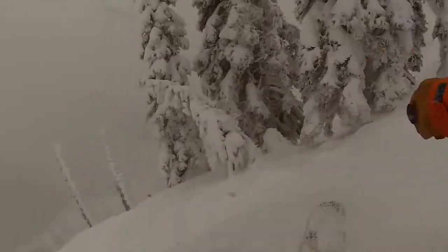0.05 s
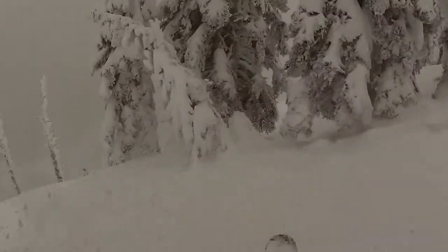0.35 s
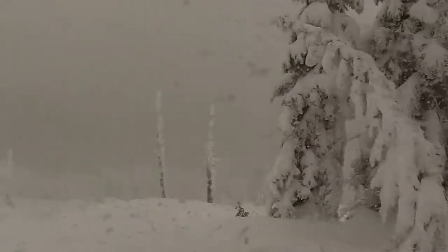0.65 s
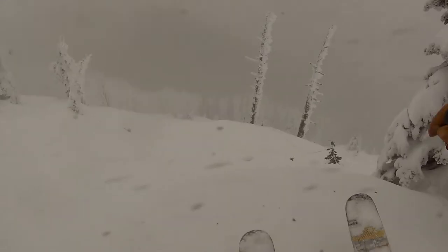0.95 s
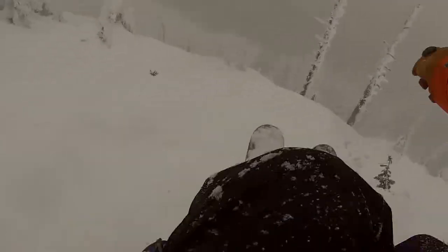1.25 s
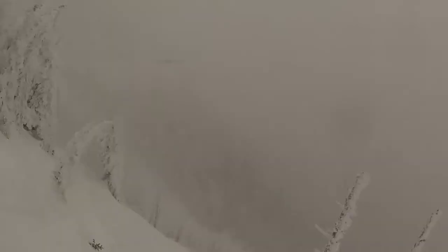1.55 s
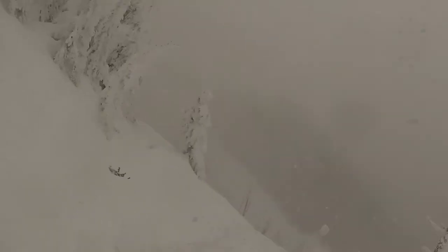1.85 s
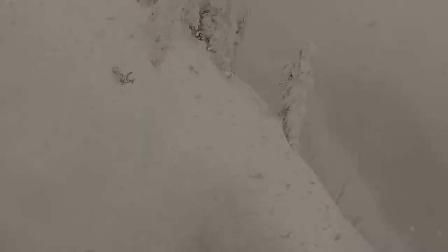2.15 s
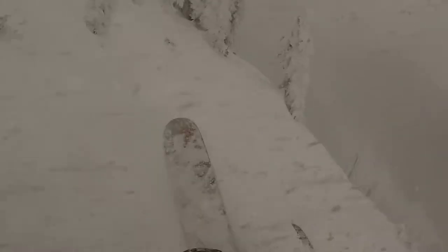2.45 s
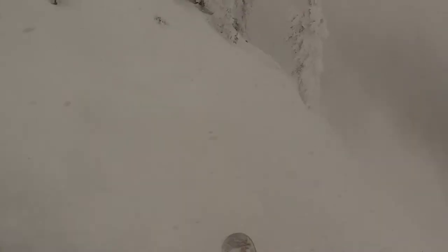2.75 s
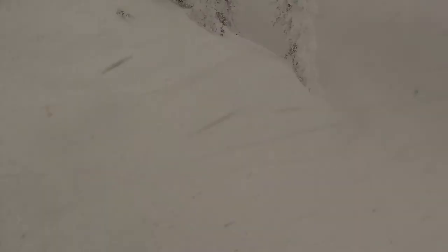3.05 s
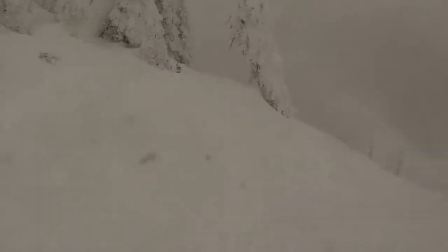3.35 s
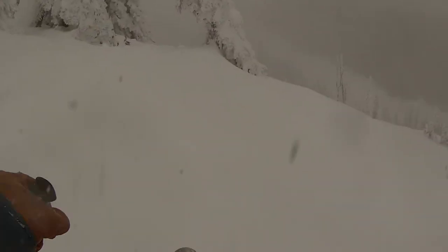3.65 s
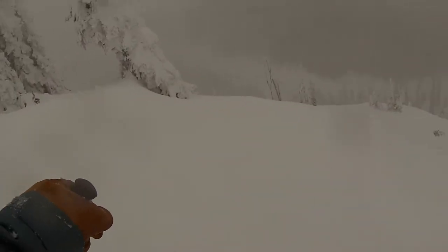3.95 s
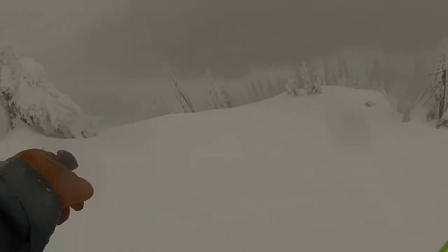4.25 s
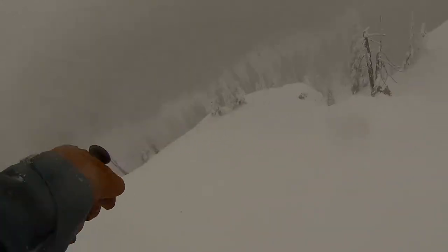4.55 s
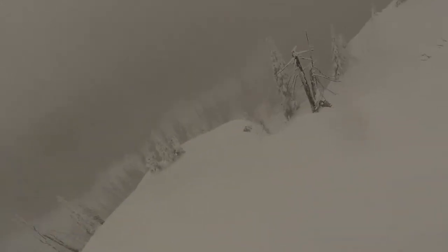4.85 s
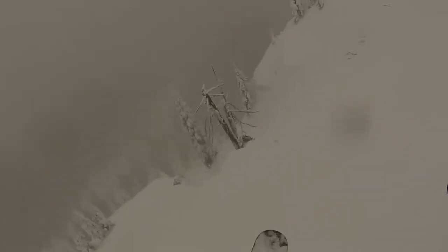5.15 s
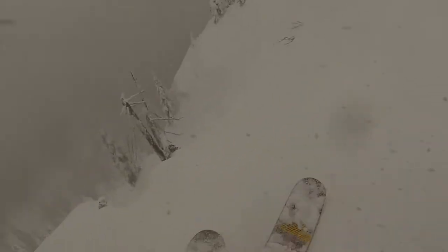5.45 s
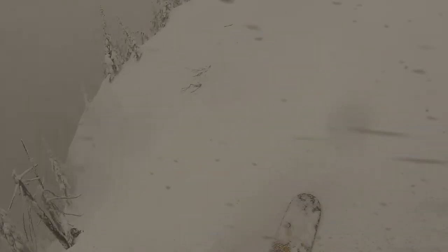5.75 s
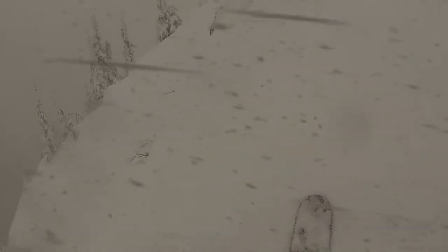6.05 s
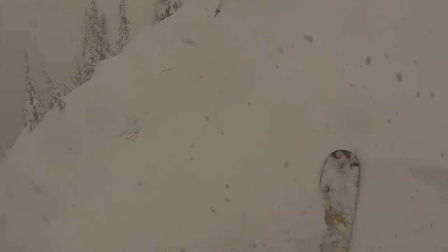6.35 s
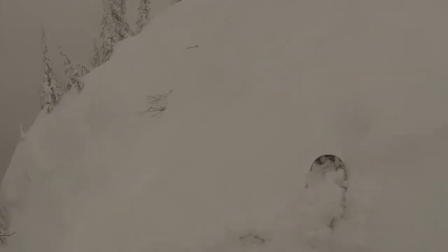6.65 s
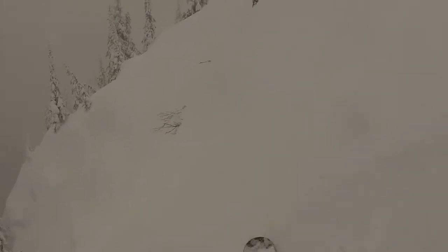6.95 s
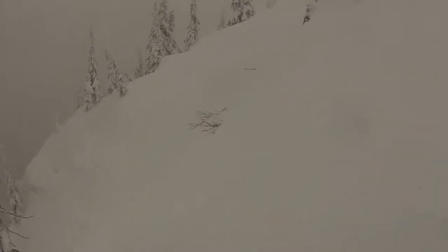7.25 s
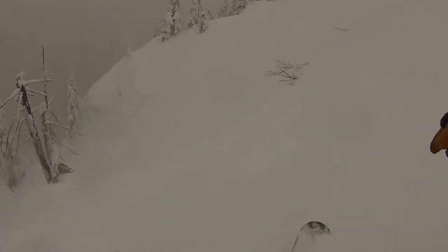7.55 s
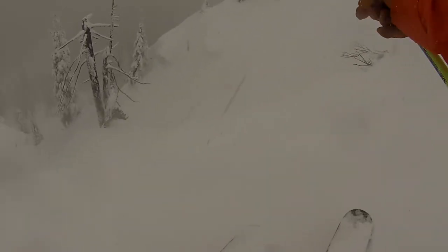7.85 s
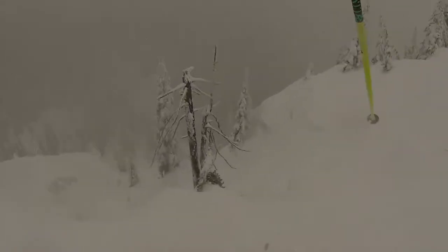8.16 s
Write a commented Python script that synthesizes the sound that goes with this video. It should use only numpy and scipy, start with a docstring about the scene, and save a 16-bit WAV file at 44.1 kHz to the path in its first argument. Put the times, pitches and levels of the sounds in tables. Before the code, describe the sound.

Powder spray hisses with each ski turn, mixed with close jacket rubbing, sharp buckle knocks, dull bumps and low wind buffeting.

```python
"""Hissing, crackling spray rises with each turn of a skier in deep powder, heard at a chest camera.
The jacket rubs on the camera case; buckle and zip knock on it, hard enough to overload the microphone.
Crumbs of snow tick on the case, bumps thump through the strap and wind rumbles.
From about 3 s a fast soft thud, likely the heartbeat, runs underneath."""
import sys
import numpy as np
from scipy import signal
from scipy.fft import rfft, irfft
from scipy.io import wavfile

SR = 44100
rng = np.random.default_rng(int(sys.argv[2]) if len(sys.argv) > 2 else 0)


def store_wav(level_fs):
    """Save 16-bit WAV to argv[1]."""
    pcm = np.round(np.clip(np.atleast_2d(level_fs), -1, 1) * 32767)
    wavfile.write(sys.argv[1], SR, pcm.T.astype(np.int16))


N = 366912
TIME = np.arange(N) / SR

# Jacket strokes over the case. Each row: time of peak in seconds, length in seconds, level in dB.
RUB_STROKES = [(0.114, 0.075, -30), (0.195, 0.054, -22), (0.266, 0.048, -19.5), (0.342, 0.099, -40.5),
               (0.639, 0.056, -24.5), (0.8, 0.09, -17), (0.951, 0.13, -34), (1.048, 0.053, -14),
               (1.116, 0.05, -19.5), (1.202, 0.054, -32), (1.289, 0.056, -24.5), (1.40, 0.084, -32),
               (1.474, 0.054, -27.5), (1.727, 0.053, -28.5), (1.977, 0.14, -25), (2.164, 0.13, -22.5),
               (2.253, 0.047, -16), (2.448, 0.12, -38), (2.484, 0.017, -23), (2.77, 0.043, -24),
               (3.712, 0.091, -41), (4.24, 0.027, -43), (4.479, 0.088, -51.5), (4.764, 0.14, -39.5),
               (4.953, 0.044, -23), (4.989, 0.038, -29), (5.072, 0.042, -33), (5.282, 0.048, -17),
               (5.328, 0.059, -27.5), (5.479, 0.069, -22.5), (5.549, 0.047, -32), (7.609, 0.034, -25.5),
               (8.009, .13, -27), (8.227, 0.022, -14.5), (8.273, 0.17, -29)]
# Spectrum of cloth slipping on the case. Each row: frequency in Hz, gain in dB.
RUB_SPECTRUM = [(500, -38), (800, -14), (1150, -14.5), (1450, 6.5), (1700, 3), (2100, -4.5), (2500, -9.5),
                (3500, -15), (4100, -26.5), (7000, -33), (10000, -58)]
# Spectrum of snow hitting the case. Each row: frequency in Hz, gain in dB.
CRUMB_SPECTRUM = [(1000, -25), (1550, 4), (2300, 4), (3200, 4.5), (4000, 0.5), (4700, 1), (7000, -5),
                  (11000, -10), (15000, -20)]
# Bumps through the strap. Each row: start in seconds, peak in dB, pitch in Hz.
BUMPS = [(0.212, -20, 130), (1.29, -2.5, 121), (1.404, -8, 91), (1.718, -12, 90), (1.89, -8.5, 60.4),
         (2.052, -16, 164), (2.177, -8.5, 77.5), (2.266, -10.5, 204.6), (2.55, -21.5, 150),
         (2.725, -22, 110), (8.243, -14.5, 153)]


def spray():
    """Powder hisses on skis and case and crunches as it packs; more flying snow, denser grains."""
    # Each row: frequency in Hz, gain in dB.
    hiss_spectrum = [(300, -17.5), (1120, -20.5), (1520, -0.5), (1900, -9), (2150, 1.5), (2500, -12.5),
                     (2950, -8.5), (4000, -5.5), (4650, 2.5), (5900, -8), (7100, -4.5), (9800, -14.5),
                     (10900, -6.5), (15000, -26.5)]
    crunch_spectrum = [(400, -25), (780, -7.5), (1000, -15), (1500, -5.5), (2200, 1.5), (2700, 0.5),
                       (3300, 5), (4100, -6.5), (9000, -23)]
    # How hard the skis pack the snow. Each row: time in seconds, crunch in dB relative to snow_db.
    packing = [(0, 24.5), (.55, 3), (.9, 8), (2.55, -1), (3.1, 0.5), (3.5, 3), (5.6, 8), (6.0, 3.5),
               (6.4, 4.5)]
    snow_db = thrown_snow_db()
    grains_per_s = np.clip(1800 * undb(snow_db + 40), 450, 6000)
    dust = crackle(grains_per_s)
    hiss = unit(colour(dust, hiss_spectrum)) * undb(3.0 + 1.5 * walk(40))
    crunch = unit(colour(dust + crackle(grains_per_s / 2), crunch_spectrum))
    crunch *= undb(curve(packing) + 1.12 * walk(60))
    return (hiss + crunch) * undb(snow_db)


def thrown_snow_db():
    """Level of flying snow: builds fast, sags while the ski is loaded, then settles."""
    # Skis press into powder, a few times a turn. Each row: start in seconds, length in seconds, level in dB.
    presses = [(0.345, 0.1, -48), (0.513, 0.027, -39), (0.748, 0.057, -36.5), (0.861, 0.11, -48),
               (1.273, 0.092, -56), (1.584, 0.62, -51.5), (2.12, 0.16, -45), (2.485, 0.11, -36),
               (2.661, 0.13, -47), (2.857, 0.51, -40.5), (3.366, 0.27, -41), (5.521, 0.22, -46.5),
               (5.821, 0.28, -38), (6.01, 0.23, -32), (6.281, 0.11, -41.5), (7.967, 0.18, -53.5),
               (8.29, .05, -45.5)]
    build_db_per_s, sag_db_per_s, settle_db_per_s = 328, 18.5, 145.5
    power = undb(-68.5) ** 2  # a trace of snow always flies
    for start_s, length_s, db in presses:
        age_s = TIME - start_s
        drop_db = (build_db_per_s * np.maximum(-age_s, 0)
                   + sag_db_per_s * np.maximum(age_s, 0)
                   + settle_db_per_s * np.maximum(age_s - length_s, 0))
        power = power + undb(db - np.minimum(drop_db, 100)) ** 2
    return 10 * np.log10(power)


def crackle(grains_per_s, crumble_s=0.0007):
    """Snow grains hit and crumble into brief noise; loudness stays even as the rate changes."""
    impacts = unit(grains(grains_per_s, spread_db=4, most=3.5) / np.sqrt(grains_per_s))
    energy = signal.lfilter([1], [1, -np.exp(-1 / (crumble_s * SR))], impacts ** 2)
    crumbling = unit(np.sqrt(energy + 1e-18))
    return unit(.5 * impacts + crumbling * rng.standard_normal(N))


def jacket(rise_share=0.68):
    """Cloth sticks and slips on the case, lightly all the time and hard in short strokes."""
    # Hollow note of slack cloth. Each row: time in seconds, level in dB relative to the rub.
    slack = [(0, -4.5), (1.1, -20), (2.5, -25)]
    cloth_mode = [(824, 770, 0)]  # centre in Hz, width in Hz, gain in dB
    pressure = undb(-61 + 5 * np.minimum(walk(26), 2))
    for peak_s, length_s, db in RUB_STROKES:
        pressure += undb(db) * swell(peak_s, rise_share * length_s, (1 - rise_share) * length_s)
    slips = grains(800, spread_db=1.5) + .35 * rng.standard_normal(N)
    grip = undb(5.5 * np.tanh(walk(130)))
    hollow = unit(ring(ring(slips, cloth_mode), cloth_mode)) * undb(curve(slack))
    return (unit(colour(slips, RUB_SPECTRUM)) - hollow) * grip * pressure


def snaps(above_rub_db=15.5, size=900):
    """At the height of each rub the cloth lets go with one big slip."""
    out = np.zeros(N)
    slip = colour(signal.unit_impulse(size), RUB_SPECTRUM)
    for peak_s, _, db in RUB_STROKES:
        add(out, peak_s, peak(slip, db + above_rub_db))
    return out


def knocks(size=1500):
    """Buckle and zip hit the case; harder blows scrape longer, then the pressing buckle damps the ring."""
    # Each row: start in seconds, peak in dB.
    blows = [(0.1771, 2), (0.673, 0.5), (0.7135, 3.5), (0.7443, -3.5), (0.7511, -5), (0.7768, -9.5),
             (0.7836, -4), (1.044, 6.5), (1.1847, -15.5), (1.2003, -14), (1.3729, -15), (1.3871, -11),
             (1.4839, 10.5), (1.8897, -6.5), (1.9222, 19), (2.0187, -5.5), (2.049, -5.5), (2.1976, 1),
             (2.2912, 8.5), (2.3835, 9), (8.213, -1), (8.222, -18), (8.242, -1), (8.3075, 9.5)]
    # Each row: centre in Hz, width in Hz, gain in dB.
    case_modes = [(744, 240, -18.5), (1540, 130, 6.5), (1988, 390, 2), (2875, 400, -7), (4285, 69, -13),
                  (6460, 800, -16)]
    out, t = np.zeros(N), np.arange(size) / SR
    for start_s, db in blows:
        contact_s = min(0.00036 + 0.0007 * undb(db), .003)
        force = 0.28 * rng.standard_normal(size) * np.exp(-(t / contact_s) ** 4)
        force[0] += 1
        ringing = cut(ring(force, case_modes), 3800, "low")
        smother = np.exp(-(t / (contact_s + .0035)) ** 4)
        add(out, start_s, peak(ringing * smother, db))
    return out


def clacks(attack_s=0.00031, size=4000):
    """Hollow clacks, likely ski on ski: a padded blow leaves a brief ring."""
    # Each row: start in seconds, peak in dB.
    blows = [(1.312, 0), (2.267, -2.5)]
    # Each row: centre in Hz, width in Hz, gain in dB.
    ski_modes = [(746, 49, -13), (845, 380, -7), (1404, 180, -12.5), (2120, 120, -17)]
    out, t = np.zeros(N), np.arange(size) / SR
    tone = sum(undb(db) * np.sin(2 * np.pi * hz * t) * np.exp(-np.pi * width_hz * t)
               for hz, width_hz, db in ski_modes)
    clack = tone * (1 - np.exp(-t / attack_s))
    for start_s, db in blows:
        add(out, start_s, peak(clack, db))
    return out


def jolts(size=4000):
    """The strap takes each bump as one heavily damped swing."""
    out, t = np.zeros(N), np.arange(size) / SR
    for start_s, db, hz in BUMPS:
        swing = np.sin(2 * np.pi * hz * t) * np.exp(-1.9 * hz * t)
        add(out, start_s, peak(swing, db))
    return out


def crumbs(decay_s=0.0016, size=900):
    """Single snow crumbs tick on the case and break into dust."""
    # Each row: start in seconds, peak in dB.
    hits = [(1.349, -22.5), (2.664, -19.5), (2.6882, -18.5), (2.6995, -15), (2.832, -16.5), (2.9448, -16),
            (2.9972, -14.5), (3.2102, -29), (3.9354, -22), (3.9596, -25), (4.482, -26), (5.226, -25),
            (5.2996, -15), (5.405, -18), (6.257, -7.5), (6.2852, -8.5), (7.0165, -29.5), (7.416, -18),
            (7.7578, -32), (7.9132, -28.5), (8.0616, -13.5), (8.1202, -15.5)]
    out, t = np.zeros(N), np.arange(size) / SR
    for start_s, db in hits:
        force = 0.52 * rng.standard_normal(size) * np.exp(-t / decay_s)
        force[0] += 1
        add(out, start_s, peak(colour(force, CRUMB_SPECTRUM), db))
    return out


def wind():
    """Eddies rumble on the case and cloth flutters in soft flaps; each bump adds a buffet."""
    # Air on the case. Each row: time in seconds, level in dB.
    airflow = [(0.0, -33.5), (0.14, -42), (0.28, -47), (0.97, -41), (1.25, -41.5), (2.2, -38.5),
               (3.01, -54.5), (3.54, -50), (4.08, -55), (4.96, -46), (5.42, -43), (5.63, -51.5),
               (6.14, -47.5), (6.46, -58.5), (7.46, -58.5), (8.2, -43), (8.32, -38)]
    # Each row: frequency in Hz, gain in dB.
    wind_spectrum = [(22, 8.5), (100, -3.5), (300, -14), (600, -27.5), (1500, -56)]
    breeze_db, flutter_growth = -47.5, 0.093  # flutter grows faster than the flow
    eddies = colour(rng.standard_normal(N), wind_spectrum, size=8192)
    flicks = grains(120, spread_db=-1.0, most=4.0) + .5 * rng.standard_normal(N)
    flaps = colour(flicks, wind_spectrum, size=8192)
    buffets = sum(undb(db - 22.5) * swell(start_s + 0.014, rise_s=0.029, fall_s=0.049)
                  for start_s, db, _ in BUMPS)
    flow_db = 20 * np.log10(undb(curve(airflow)) + buffets)
    flutter_db = flow_db - 2.5 + flutter_growth * (flow_db - breeze_db)
    rumble = unit(cut(eddies, 120, "low")) * undb(flow_db + 7 + 2 * walk(19))
    flutter = unit(cut(flaps, 100, "high")) * undb(flutter_db + 6.2 * np.tanh(walk(30)))
    return rumble + flutter


def heart(first_s=3.049, period_s=0.4103, pitch_hz=42, size=8000):
    """Likely the heartbeat through the strap: a dull thud, a weaker one just after."""
    out, t = np.zeros(N), (np.arange(size) - size / 2) / SR
    thud = np.cos(2 * np.pi * pitch_hz * t) * np.exp(-(t / 0.014) ** 2)
    for beat_s in np.arange(first_s, N / SR, period_s):
        add(out, beat_s + t[0], peak(thud, db=-27.5))
        add(out, beat_s + t[0] + 0.0425, peak(thud, db=-33.5))
    return out


def glide():
    """Ski bases rush softly; flurries of flakes patter on the case."""
    # Each row: frequency in Hz, gain in dB.
    rush_spectrum = [(200, 0.5), (450, -12), (1050, -7), (1550, -12), (2200, -5), (3400, -23.5),
                     (4050, -16), (4690, -33.5), (7200, -30.5), (15000, -47.5)]
    rush = unit(colour(rng.standard_normal(N), rush_spectrum)) * undb(-58.0 + 2 * walk(3.5))
    flurries = undb(5 * np.minimum(walk(7), 1))
    flakes = grains(32, spread_db=4.5, most=3) * flurries
    return rush + unit(colour(flakes, CRUMB_SPECTRUM)) * undb(-60.5)


def undb(db):
    """Decibels to gain."""
    return 10 ** (np.asarray(db) / 20)


def unit(x):
    """Scale to rms 1."""
    return x / np.sqrt(np.mean(x ** 2))


def peak(x, db):
    """Scale to a peak level."""
    return x * undb(db) / np.abs(x).max()


def curve(points):
    """Join (seconds, value) points by straight lines."""
    times_s, values = np.transpose(points)
    return np.interp(TIME, times_s, values)


def swell(peak_s, rise_s, fall_s):
    """Smooth hump, 1 at peak_s."""
    return np.exp(-2 * ((TIME - peak_s) / np.where(TIME < peak_s, rise_s, fall_s)) ** 2)


def add(out, start_s, x):
    """Mix in a short sound."""
    i = int(np.clip(start_s * SR, 0, N - 1))
    out[i:i + len(x)] += x[:N - i]


def walk(rate_hz):
    """Random levels joined by lines, spread near 1."""
    levels = rng.standard_normal(N // 20)
    return np.sqrt(3 / 2) * np.interp(TIME * rate_hz, np.arange(len(levels)), levels)


def grains(rate_per_s, spread_db, most=5.4):
    """Random tiny impacts, rms 1; their levels span most * spread_db."""
    strength = undb(spread_db * np.minimum(rng.exponential(size=N), most))
    return unit((rng.random(N) < rate_per_s / SR) * strength * rng.choice([-1, 1], N))


def cut(x, hz, kind):
    """Second-order low-pass or high-pass."""
    return signal.sosfilt(signal.butter(2, hz, kind, fs=SR, output="sos"), x)


def colour(x, points, size=1024):
    """Minimum-phase filter whose gain follows (Hz, dB) points."""
    hz, db = np.transpose(points)
    bins_hz = np.maximum(np.arange(size // 2 + 1) * SR / size, 1)
    gain = undb(np.interp(np.log(bins_hz), np.log(hz), db))
    cepstrum = irfft(np.log(gain))
    cepstrum[1:size // 2] *= 2
    cepstrum[size // 2 + 1:] = 0
    return signal.fftconvolve(x, irfft(np.exp(rfft(cepstrum))))[:len(x)]


def ring(x, modes):
    """Drive a body's resonant modes."""
    return sum(undb(db) * signal.lfilter(*signal.iirpeak(hz, hz / width_hz, fs=SR), x)
               for hz, width_hz, db in modes)


def scene():
    """Snow, case noises, body and wind at one microphone."""
    mix = spray() + glide() + jacket() + snaps() + knocks() + crumbs()
    return (mix + clacks() + jolts() + heart() + wind())[None]


def record(dry):
    """The hardest knocks overload the microphone, which shaves their peaks; the top is cut."""
    limit, overload_band_hz, top_hz = 0.88, 9000, 15500
    excess = dry - np.clip(dry, -limit, limit)
    shaved = dry - signal.sosfiltfilt(signal.butter(4, overload_band_hz, fs=SR, output="sos"), excess)
    return signal.sosfiltfilt(signal.ellip(6, .1, 50, top_hz, fs=SR, output="sos"), shaved)


dry = scene()
out = record(dry)
store_wav(out)
```